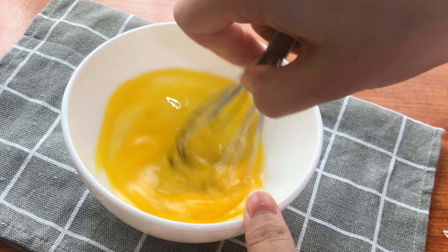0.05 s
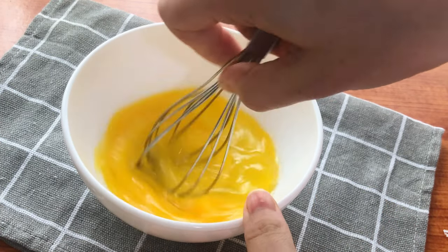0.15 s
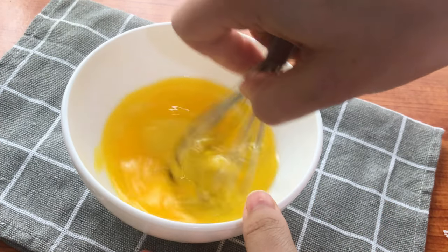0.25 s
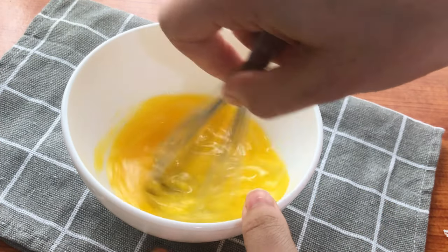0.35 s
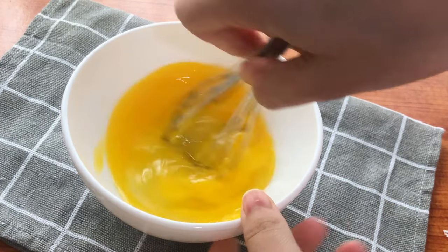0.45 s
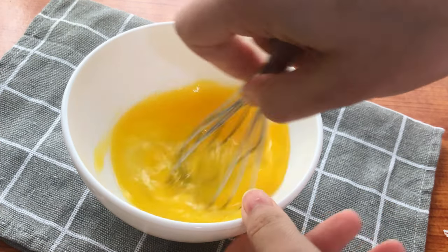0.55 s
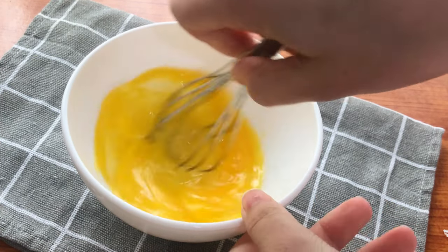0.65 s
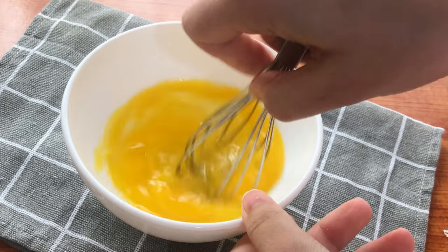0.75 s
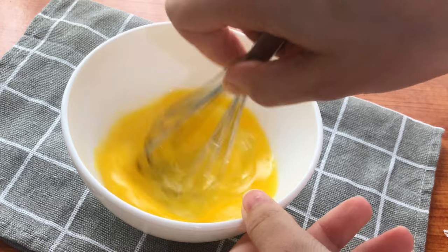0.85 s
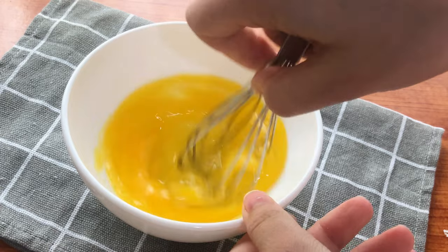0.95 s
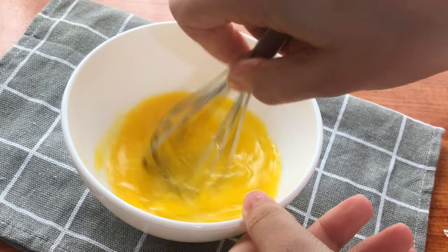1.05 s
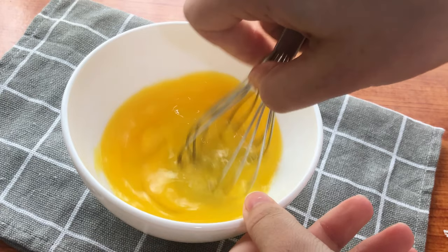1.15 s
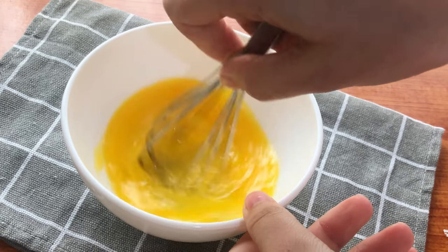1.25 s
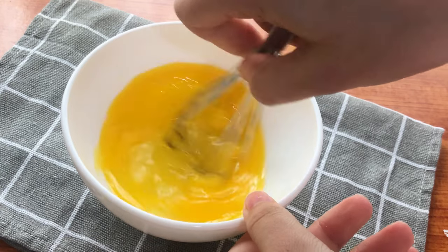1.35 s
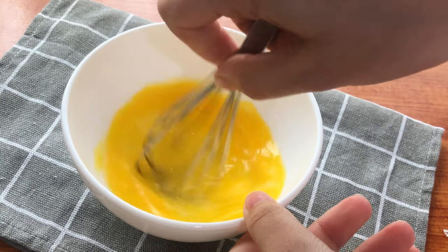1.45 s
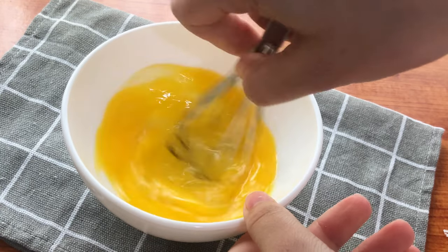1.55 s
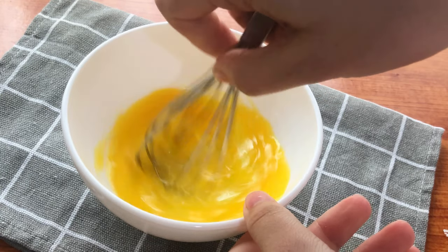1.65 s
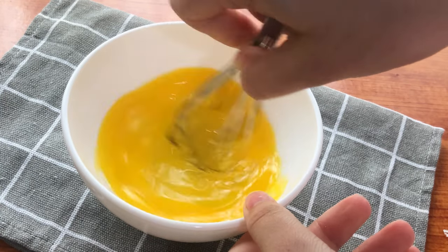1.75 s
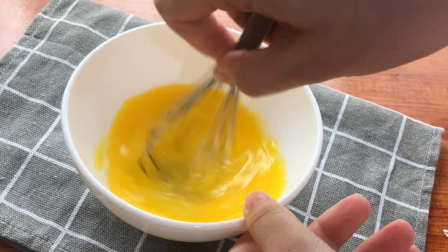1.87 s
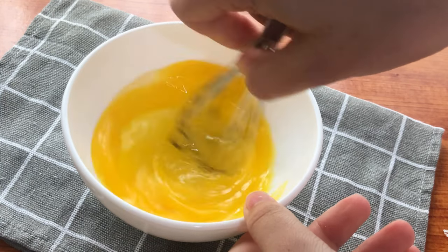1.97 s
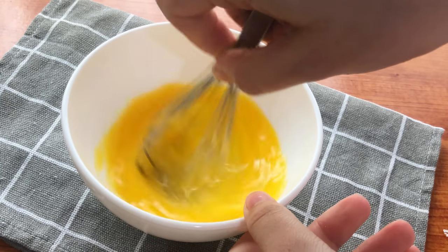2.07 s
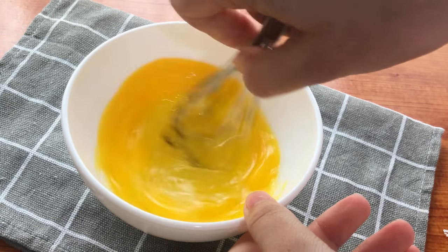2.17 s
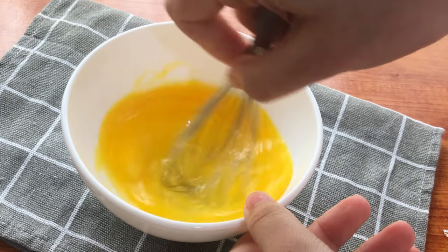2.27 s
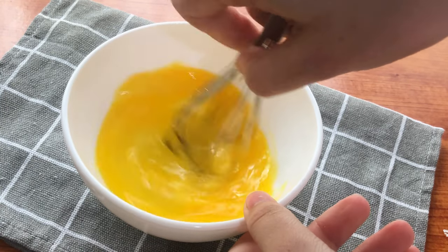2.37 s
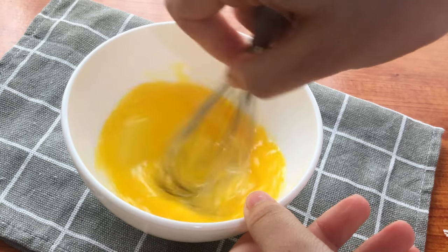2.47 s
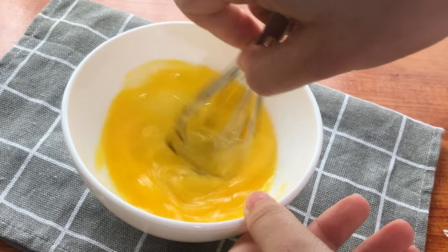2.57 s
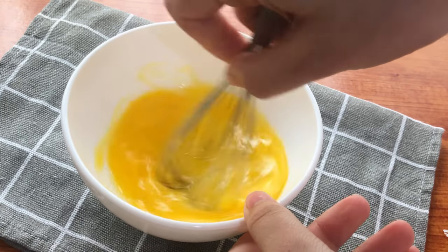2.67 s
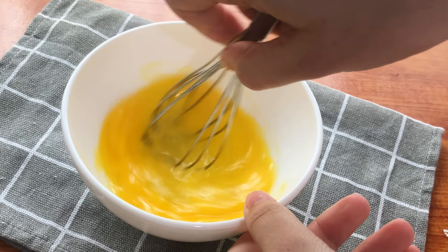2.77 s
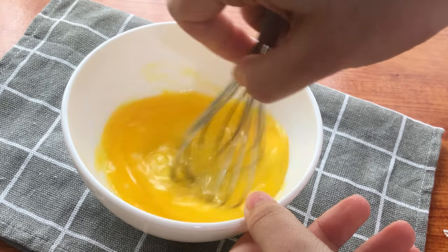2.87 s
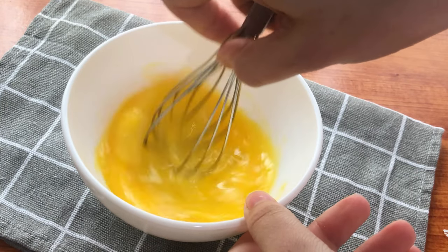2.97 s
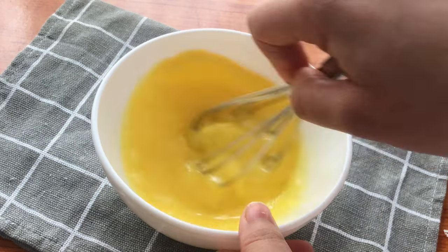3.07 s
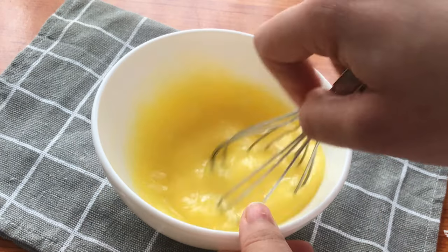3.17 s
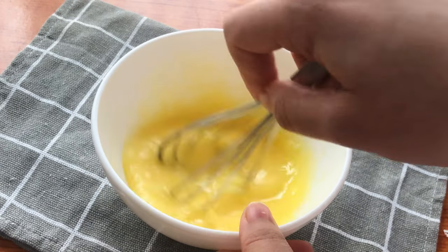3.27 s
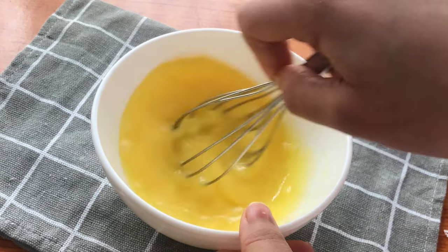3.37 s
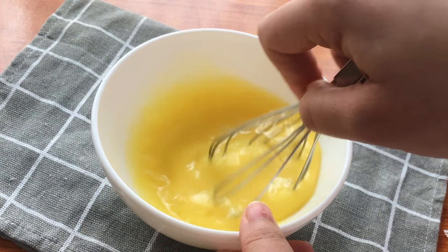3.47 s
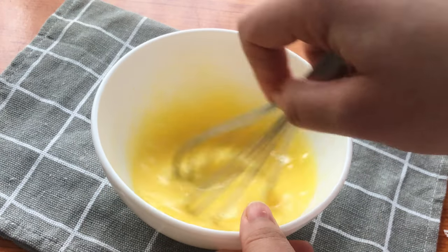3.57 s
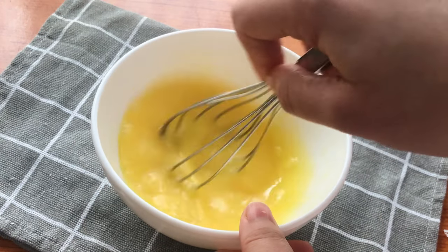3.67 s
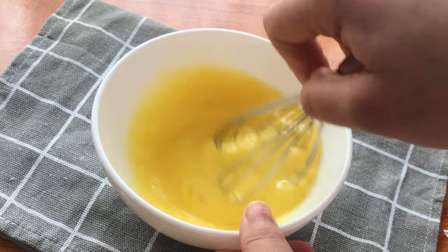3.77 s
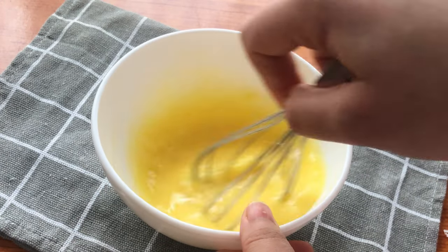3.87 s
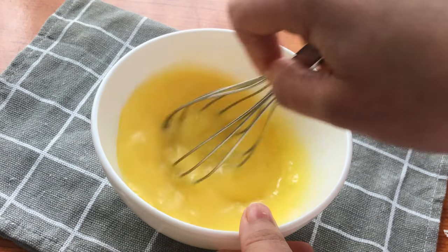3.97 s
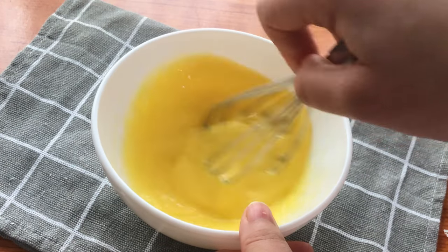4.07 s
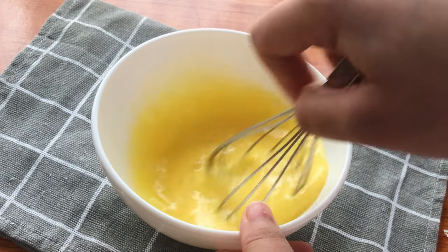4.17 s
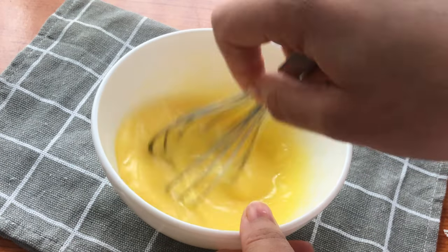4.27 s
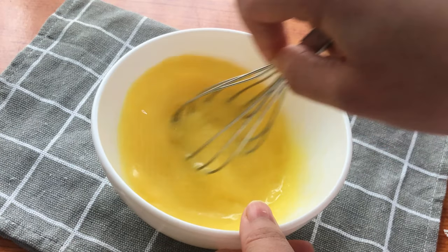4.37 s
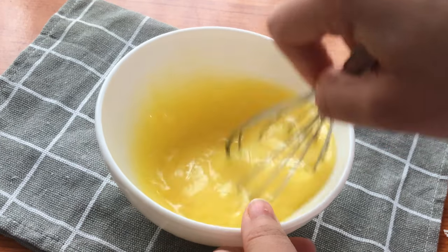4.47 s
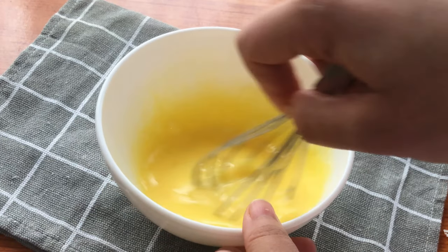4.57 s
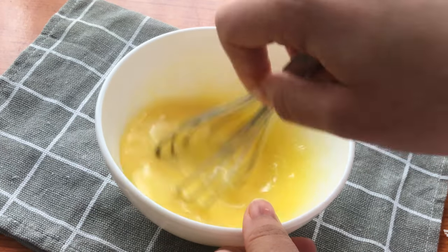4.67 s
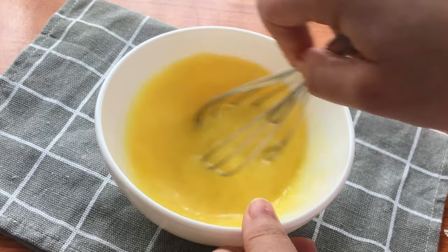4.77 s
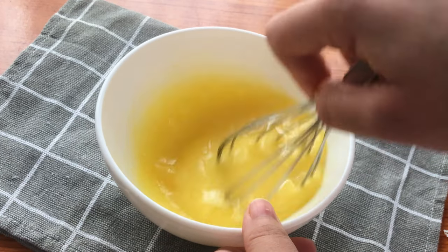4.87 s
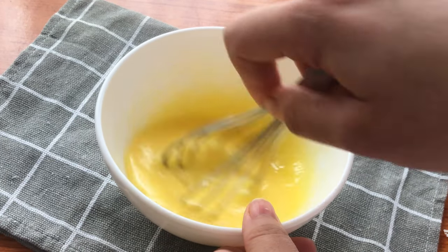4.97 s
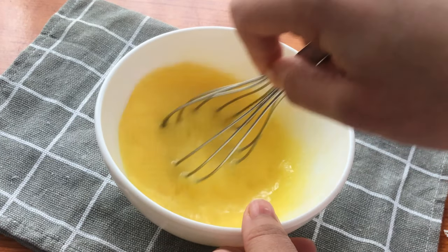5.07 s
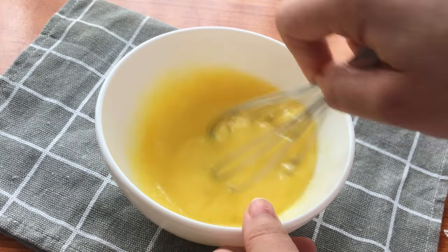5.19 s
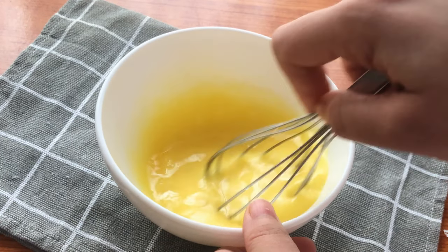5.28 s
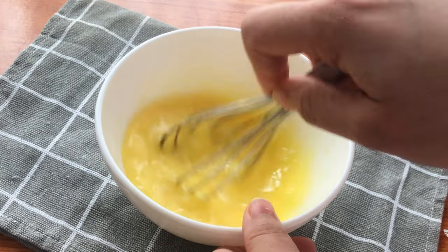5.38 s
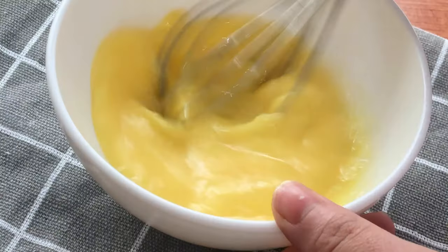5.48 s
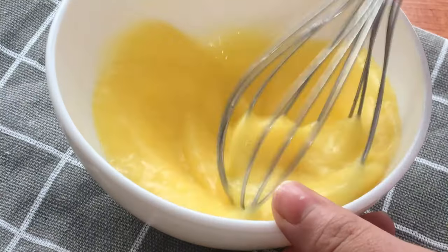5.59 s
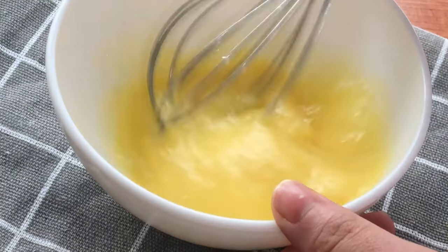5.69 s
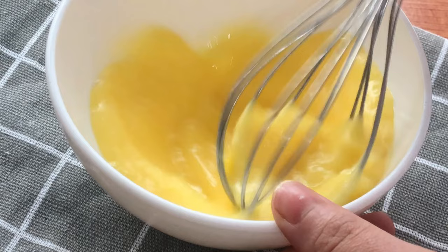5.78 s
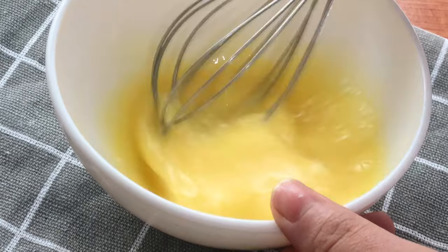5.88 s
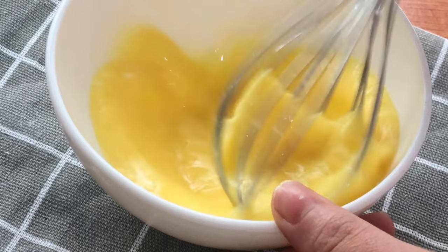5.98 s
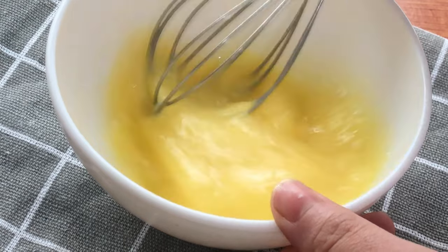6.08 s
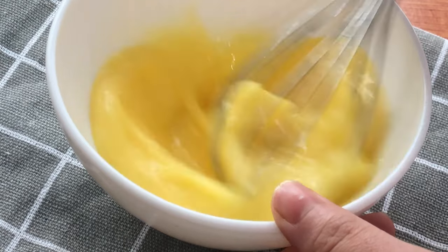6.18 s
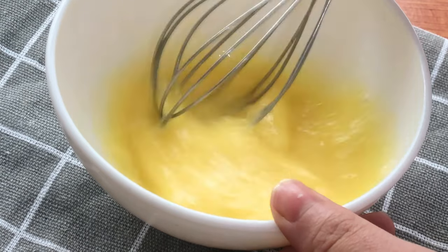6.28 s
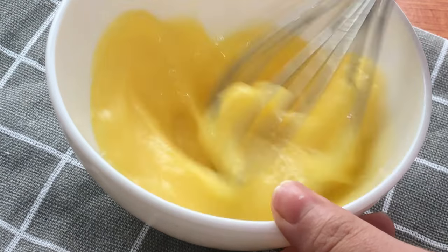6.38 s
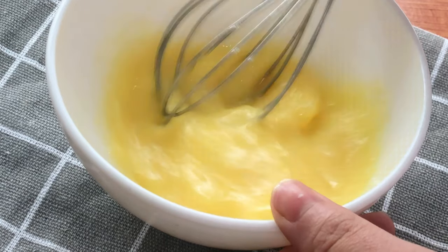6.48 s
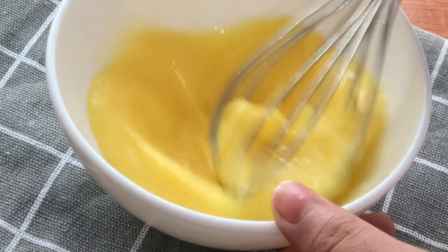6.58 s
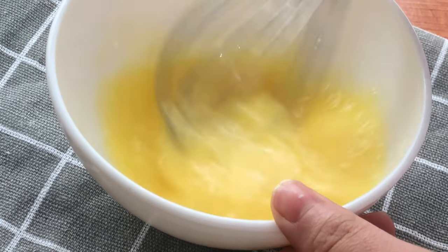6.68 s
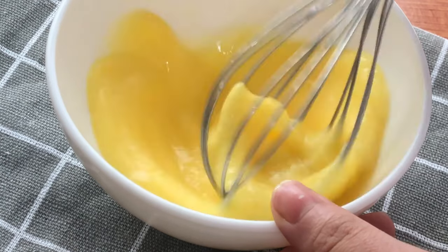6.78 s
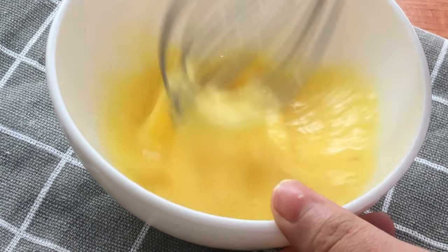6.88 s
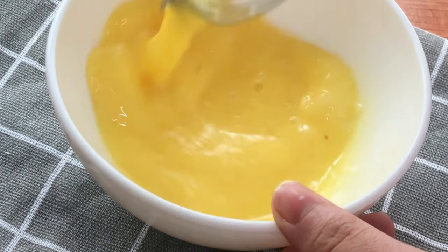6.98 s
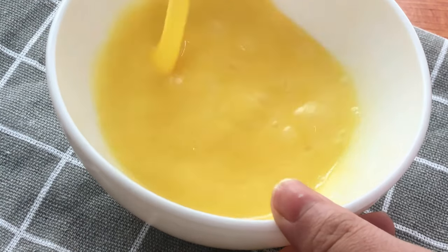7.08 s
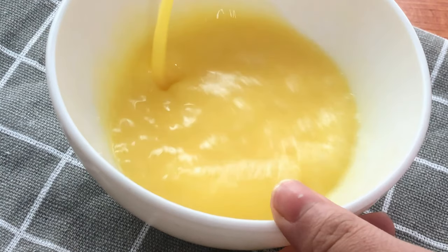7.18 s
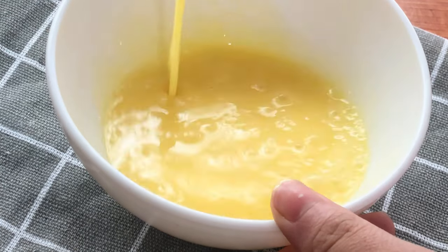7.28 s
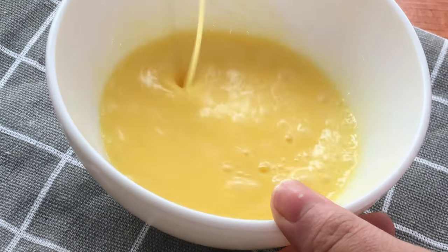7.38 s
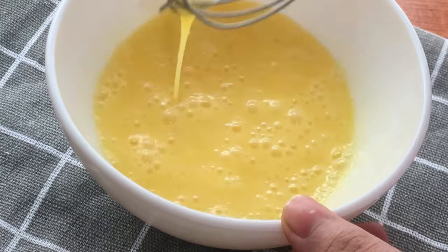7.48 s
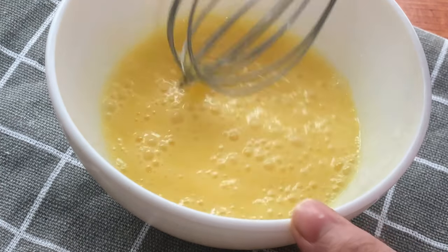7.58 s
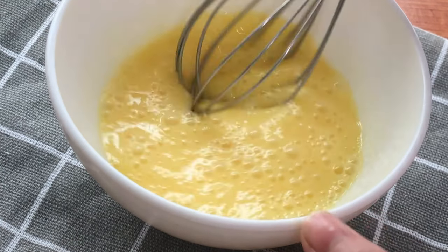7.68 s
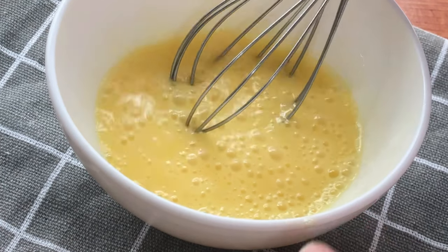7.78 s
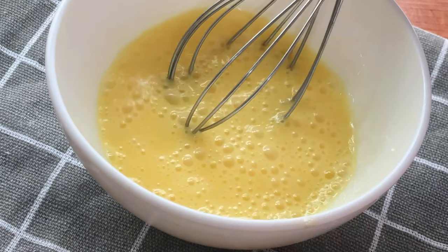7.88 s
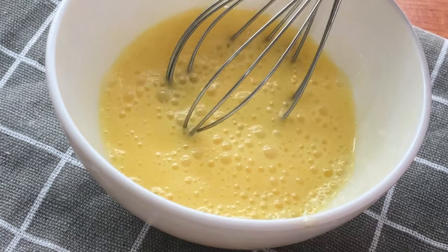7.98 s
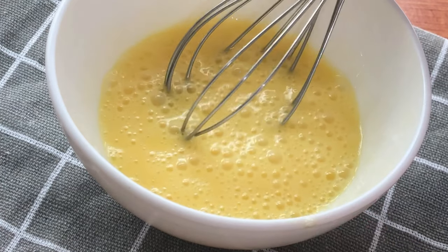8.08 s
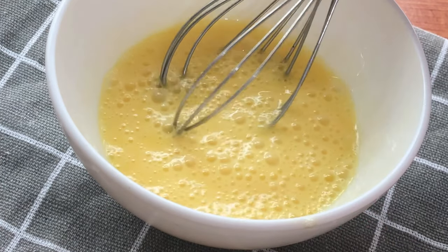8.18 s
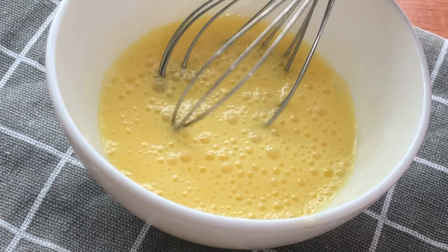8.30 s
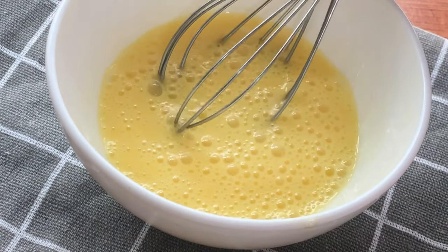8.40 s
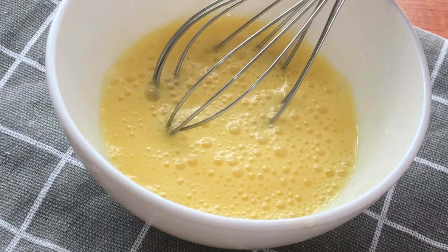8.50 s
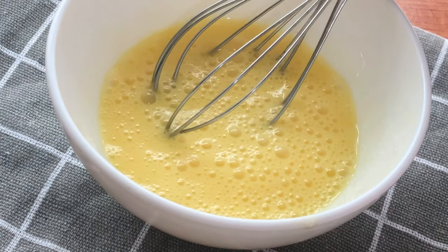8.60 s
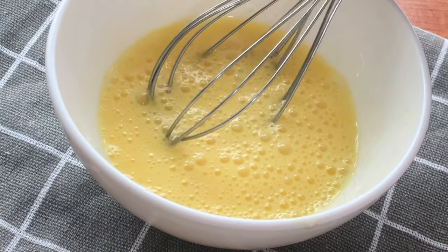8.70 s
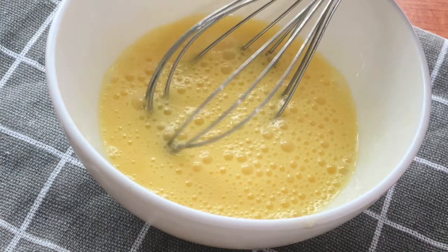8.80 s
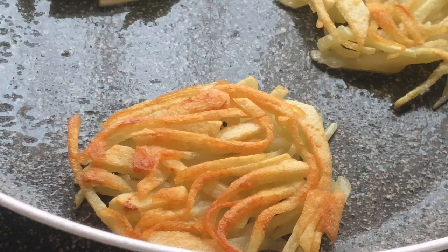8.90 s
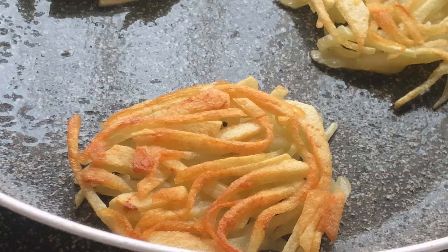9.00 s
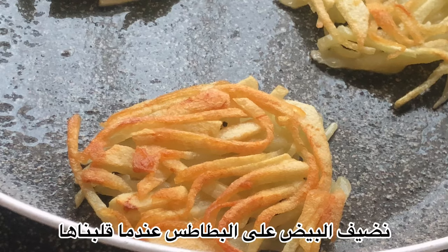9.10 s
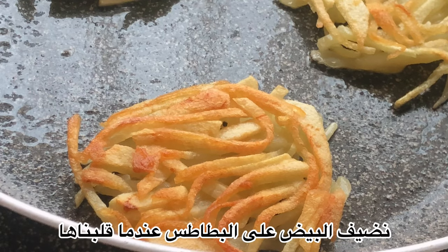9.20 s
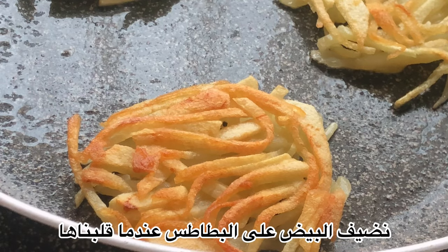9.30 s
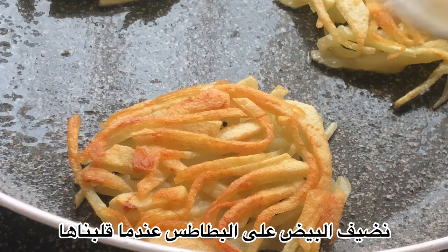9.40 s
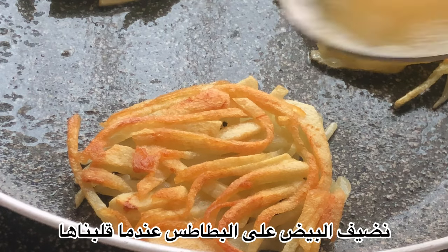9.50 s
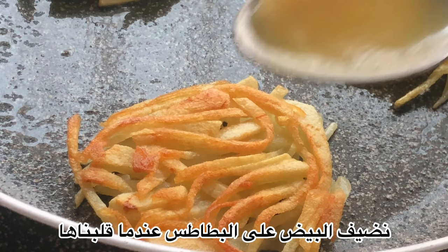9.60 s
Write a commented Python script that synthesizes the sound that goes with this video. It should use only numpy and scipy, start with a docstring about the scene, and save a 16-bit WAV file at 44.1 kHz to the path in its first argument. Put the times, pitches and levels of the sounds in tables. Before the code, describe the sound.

From 0 to 3 s a wire whisk drags quickly through egg in a ceramic bowl, close to the microphone: thin, bright, scratchy strokes, several per second, with small ticks and a sharp ringing knock near 1.95 s and another near 2.35 s. A low, noisy drone with slow swells lies underneath. At about 3.1 s the drone stops, leaving soft room hiss and one faint swell near 3.9 s; stirring continues smoother and wetter, with light taps, until 5.4 s. From 5.45 to 6.75 s hard whipping brings loud clacks, wet plops, swishes and sloshing, the sharpest snap near 6.3 s. Then it calms, with tiny bubble ticks, faint taps at 7.4 s and two soft knocks around 7.7 s. From 8 to 8.9 s, delicate wire clinks and rubbing on the rim. At 8.9 s steady oil sizzle begins, with a sharp pop near 9.3 s, and continues to the end.

```python
"""A wire whisk beats eggs in a ceramic bowl close to the microphone: stirring, then whipping hard, then at rest.
Streaked noise makes the dragging wires, pulses and noise bursts the blows, decaying modes the ringing bowl.
Behind it lie room hiss, a hum and a low drone of resonant noise that goes on until the egg is frothy, with
swells that come and go. At the end potato sizzles in a pan of oil: hissing noise and dense damped blips."""
import sys
import numpy as np
from scipy import signal
from scipy.io import wavfile
from scipy.ndimage import uniform_filter1d

SR = 44100
rng = np.random.default_rng(int(sys.argv[2]) if len(sys.argv) > 2 else 0)


def materialize(psi):
    """Save the field psi as 16-bit PCM at rate SR to the path in sys.argv[1].

    A 1-D psi becomes a single channel; in a 2-D psi each row is a channel.
    """
    bounded = np.clip(np.atleast_2d(psi).T, -1, 1)
    quanta = np.round(bounded * 32767).astype(np.int16)
    wavfile.write(sys.argv[1], SR, quanta)


N = 425565  # length [samples]
FROTHY_S = 3.085  # from here the egg is thin and frothy
PAN_S = 8.923  # the pan comes in and the room hiss stops

# wire loops strike the bowl through the egg:
# (time [s], crack level [dB], nominal plop pitch [Hz], plop level [dB])
TAPS = [(0.2917, -34, 2330, -52), (0.6472, -33.5, 1410, -43), (0.673, -34.5, 1210, -54),
        (1.737, -34, 1750, -44.5), (1.947, -18, 3050, -37), (2.03, -30, 3160, -41),
        (2.3525, -22, 1910, -48), (2.3574, -24, 1250, -58), (2.346, -31, 1150, -47.5),
        (2.996, -26, 1810, -45), (3.2157, -33.5, 1140, -55), (3.3608, -48, 3070, -41),
        (3.376, -34.5, 1580, -42.5), (3.555, -32, 1380, -51), (3.682, -38.5, 2670, -46),
        (3.698, -32.5, 2610, -36.5), (3.797, -38, 2240, -49), (4.0038, -43, 2800, -40),
        (4.0255, -38, 2450, -46), (4.036, -35.5, 1240, -49.5), (4.134, -34, 2240, -55),
        (4.191, -34.5, 2220, -45), (4.3267, -41, 2460, -49), (4.4027, -35, 1820, -44),
        (4.486, -35, 1270, -55), (4.715, -40.5, 2430, -43), (4.765, -32, 3020, -41.5),
        (4.862, -36, 2500, -58), (4.927, -35, 2080, -47), (4.99, -39.5, 2420, -60),
        (5.1266, -35.5, 1610, -43.5), (5.321, -35.5, 2060, -52), (5.452, -29.5, 1990, -38),
        (5.4987, -17, 1755, -27.5), (5.578, -57, 1270, -36), (5.664, -33.5, 1280, -33.5),
        (5.706, -19.5, 1444, -27.5), (5.804, -62, 850, -37), (5.8796, -50, 1320, -26.5),
        (5.883, -51, 690, -35), (5.904, -18.5, 1870, -25.5), (6.088, -37, 2464, -36.5),
        (6.117, -17.5, 2030, -25.5), (6.202, -28, 1065, -35.5), (6.3007, -16, 1253, -32.5),
        (6.324, -19, 1810, -28), (6.4215, -38.5, 845, -41), (6.484, -35, 1510, -54),
        (6.4956, -33, 1330, -45), (6.536, -22, 1627, -29.5), (6.6274, -26, 1580, -37),
        (6.6889, -64, 1210, -33), (6.7311, -18.5, 2040, -26), (7.349, -45, 1390, -44.5),
        (7.3928, -41.5, 1350, -45.5), (7.678, -25.5, 1105, -36.5), (7.7233, -26.5, 1160, -39.5)]
# spells of stirring: (start [s], end [s], hiss between strokes [dB])
STIR_SPELLS = [(0, 1.394, -67), (1.398, 3.09, -77.5), (3.08, 5.425, -66)]
# wires drag along the glaze, stroke by stroke: (start [s], end [s], level [dB])
STROKES = [(0, 0.168, -62.5), (0.204, 0.32, -63.5), (0.372, 0.484, -60.5), (0.528, 0.586, -58),
           (0.64, 0.713, -60.5), (0.755, 1.12, -61), (1.055, 1.245, -62.5), (1.299, 1.394, -60.5),
           (1.415, 1.456, -56), (1.482, 1.581, -57.5), (1.619, 1.641, -58.5), (1.701, 1.811, -58),
           (1.847, 1.878, -55.5), (1.95, 2.096, -58.5), (2.138, 2.224, -58.5), (2.348, 2.415, -55),
           (2.524, 2.636, -62), (2.66, 2.712, -58.5), (2.761, 3.067, -60.5), (3.111, 3.213, -56),
           (3.197, 3.32, -58), (3.37, 3.653, -58), (3.704, 3.98, -58), (4.028, 4.22, -59),
           (4.374, 4.626, -60.5), (4.754, 4.952, -59.5), (5.127, 5.42, -58.5)]


def amp(db):
    """Decibels to linear gain."""
    return 10 ** (np.asarray(db) / 20)


def evened(x):
    """Scale to an RMS of 1."""
    return x / np.sqrt(np.mean(x ** 2) + 1e-20)


def add(mix, s, sound):
    """Add a sound into the mix from time s, cut off at the end of the mix."""
    part = mix[round(s * SR):][:len(sound)]
    part += sound[:len(part)]


def noise(spectrum, size, streak_db=0., flicker_db=0., streak_frames=6, streak_bins=3,
          start_s=0, end_s=N / SR):
    """Random short-time spectra; streaks are brief narrow rings that stand out, flicker shakes all bins at once."""
    first, last = round(start_s * SR), round(end_s * SR)
    frames = 4 * (last - first) // size + 5
    hz = np.fft.rfftfreq(size, 1 / SR)
    real, imag, streaks = rng.standard_normal((frames, len(hz), 3)).T
    streaks = uniform_filter1d(streaks, streak_bins, 0)
    streaks = evened(uniform_filter1d(streaks, streak_frames, 1))
    # strong streaks are stretched upward, up to a ceiling
    streaks = np.minimum(streaks + np.maximum(streaks - 1, 0), 3.5)
    flicker = evened(uniform_filter1d(rng.standard_normal(frames), size=5))
    f, db = np.transpose(spectrum)
    colour_db = np.interp(np.log(hz + 1), np.log(f), db)[:, None]
    z = (real + 1j * imag) * amp(colour_db + streak_db * streaks + flicker_db * flicker)
    sound = signal.istft(z, nperseg=size, noverlap=3 * size // 4)[1][:last - first]
    return np.pad(evened(sound), (first, N - last))


def resonate(x, hz, width):
    """A fixed resonance of gain 1 at its centre; width in Hz."""
    return signal.lfilter(*signal.iirpeak(hz, hz / width, SR), x)


def grains(per_s, lo_hz, hi_hz, cycles, spread_db):
    """Randomly timed damped blips of ten pitches and uneven sizes."""
    size = amp(spread_db * np.minimum(rng.exponential(1, N), 4))
    size = size * (rng.random(N) < per_s / SR)
    kind, out = rng.integers(0, 10, N), np.zeros(N)
    for k, hz in enumerate(np.geomspace(lo_hz, hi_hz, num=10)):
        turns = np.arange(512) / SR * hz
        blip = np.sin(2 * np.pi * turns) * np.exp(-turns / cycles) * np.minimum(turns, 1)
        out += signal.oaconvolve(size * (kind == k), blip)[:N]
    return evened(out)


def drag():
    """Gain of the dragging wires: firm in each stroke, a low hiss between, with soft edges."""
    t, gain = np.arange(N) / SR, np.zeros(N)
    for start, end, db in STIR_SPELLS + STROKES:
        gain[(t >= start) & (t < end)] = amp(db)
    return uniform_filter1d(gain, size=300)


def stirring():
    """Dragging wires hiss in streaks; after each plop the egg sloshes and bubbles; hard whipping swishes."""
    # colours of the drag in thick egg, in frothy egg, and of the slosh:
    # each (frequency [Hz], relative density [dB per Hz])
    thick_colour, frothy_colour, slosh_colour = [
        [(1500, -14), (3000, -8.5), (4500, -3), (8500, -3.5), (12500, -2), (16000, -3.5)],
        [(700, -36), (1200, -5.5), (3830, -1.5), (8350, -9), (15500, -5)],
        [(500, -24), (1000, -5.5), (4800, -2), (7000, -15.5), (16000, -20)],
    ]
    # the loops sweep up the wall in hard whipping: (loudest moment [s], level [dB])
    swishes = [(5.54, -41), (5.744, -41), (5.944, -41.5), (6.096, -42.5), (6.142, -44), (6.345, -45.5),
               (6.555, -41), (6.751, -42.5)]
    swish_half_s = 0.011
    t = np.arange(N) / SR
    stir_end_s = STIR_SPELLS[-1][1]

    thick = noise(thick_colour, size=256, streak_db=3.6, flicker_db=3.5,
                  streak_frames=26, streak_bins=3, end_s=FROTHY_S)
    frothy = noise(frothy_colour, size=256, streak_db=3.6, flicker_db=3.0,
                   streak_frames=40, streak_bins=2, start_s=FROTHY_S, end_s=stir_end_s)
    dragging = drag() * (thick + frothy)

    stirred = np.zeros(N)  # how much the egg moves after the plops
    settle_t = t[:20000]
    for s, _, _, plop_db in TAPS:
        settling = amp(plop_db - 23.5 - 60 * settle_t / 0.5) * np.minimum(settle_t / 0.0046, 1)
        add(stirred, s, settling)
    slosh = noise(slosh_colour, size=256, streak_db=4.0, flicker_db=4.5)
    bubbles = grains(500, 800, 6500, 2.1, 5.2)
    settling_egg = stirred * (0.47 * slosh + 0.58 * bubbles)

    sweep = sum(amp(db) * np.exp(-((t - s) / swish_half_s) ** 2) for s, db in swishes)
    spray = noise([(600, -17.5), (1500, 2.0), (5000, 0.5), (9000, -6.0), (15000, -0.5)], size=256,
                  streak_db=3, flicker_db=1.5, streak_frames=30, streak_bins=2,
                  start_s=stir_end_s, end_s=PAN_S)
    return dragging + settling_egg + sweep * spray


def low_drone():
    """Noise in a few low resonances with a broad shoulder, steady until the egg is frothy, and its swells."""
    # resonances of the drone: (frequency [Hz], width of the first filter [Hz], relative level [dB])
    modes = [(123.6, 4.1, -5.5), (158.7, 36, -2), (223.4, 17.4, 1), (255, 17.2, -0.5), (284.3, 87, -2)]
    # swells, each around one pitch: (loudest moment [s], level [dB], half length [s], pitch [Hz])
    swells = [(0.842, -50.5, 0.18, 219), (2.848, -50, 0.19, 255), (3.872, -55.5, 0.1, 302.6),
              (7.78, -62, 0.22, 191)]
    drone_db, shoulder_db, swell_shoulder_db = -51.5, -70, -13.5  # the last is relative to its swell
    t = np.arange(N) / SR
    low_noise, wide_noise = rng.standard_normal((2, N))

    drone = np.zeros(N)
    for hz, width, db in modes:
        drone += amp(db) * evened(resonate(resonate(low_noise, hz, width), hz, 2.86 * width))
    drone = evened(drone)
    band = signal.butter(3, [330, 830], "band", fs=SR, output="sos")
    shoulder = evened(signal.sosfilt(band, wide_noise))

    out = (t < FROTHY_S) * (amp(drone_db) * drone + amp(shoulder_db) * shoulder)
    for s, db, half, hz in swells:
        same_side = (t < FROTHY_S) == (s < FROTHY_S)  # a swell never crosses into the other part
        rise = amp(db) * np.exp(-((t - s) / half) ** 2) * same_side
        pitched = evened(resonate(resonate(wide_noise, hz, 27), hz, 40))
        out += rise * (0.68 * drone + 0.77 * pitched + amp(swell_shoulder_db) * shoulder)
    return out


def room_tone():
    """Room hiss that steps in level until the pan comes in, and a wavering hum of noise near 55 Hz."""
    # colour of the hiss: (frequency [Hz], relative density [dB per Hz])
    colour = [(44, -39), (75, -7), (141, -2), (304, -7), (417, -12.5), (900, -19), (1700, -21.5),
              (2700, -30), (16500, -45.5)]
    # level steps of the hiss: (from [s], level [dB])
    step_s, step_db = np.transpose([(0, -61), (3.085, -63), (5.425, -59.5)])
    t = np.arange(N) / SR
    hum = evened(resonate(resonate(rng.standard_normal(N), 55.3, 6.4), 56.0, 34.4))
    gain = amp(step_db)[np.searchsorted(step_s, t, "right") - 1] * (t < PAN_S)
    return gain * noise(colour, size=2048) + amp(-65.5) * hum


def blows():
    """The listed blows, and a soft landing for every stroke after the first that starts without one."""
    # the soft landing: (crack level [dB], nominal plop pitch [Hz], plop level [dB])
    landing = (-46, 2550, -59)
    times = np.array(TAPS)[:, 0]
    starts = [start for start, _, _ in STROKES[1:] if abs(times - start).min() > 0.02]
    return TAPS + [(start, *landing) for start in starts]


def taps():
    """Each blow is a tick, a broad crack, a short splashy plop of trapped air and a thump of the bowl on its cloth."""
    out, t = np.zeros(N), np.arange(5000) / SR
    bright = signal.butter(2, 2200, "high", fs=SR, output="sos")
    for s, db, hz, plop_db in blows():
        crack_noise, plop_noise, thump_noise = rng.standard_normal((3, len(t)))
        tick = 0.91 * np.sin(2 * np.pi * 9000 * t) * amp(-60 * t / 0.0006)

        fall = 0.85 * amp(-60 * t / 0.013) + amp(-35 - 60 * t / 0.028)
        # the knock is strongest around 4-5.5 kHz
        knock = signal.sosfilt(bright, crack_noise) + 1.19 * resonate(crack_noise, 4770, 1370)
        crack = tick + 0.6 * knock * fall * np.minimum(t / 0.0013, 1)

        # the pocket shrinks, its pitch rises; larger pockets ring longer
        pocket = np.sin(2 * np.pi * hz * t * (0.95 + 5.75 * t))
        splash = evened(resonate(plop_noise, hz * 1.06, hz * 0.65))
        shape = np.minimum(t / 0.0018, 1) * amp(-60 * t * hz / 50)
        plop = shape * (0.62 * pocket + 0.49 * splash)

        thump_hz = 150 + 15 * thump_noise[0]
        thump = 0.4 * evened(resonate(thump_noise, 140, 55)) + 0.56 * np.sin(2 * np.pi * thump_hz * t)
        thump = thump * np.minimum(t / 0.025, 1) * amp(-12.5 - 60 * t / 0.28)
        add(out, s - 0.0003, amp(db) * crack + amp(plop_db) * (plop + thump))
    return out


def bowl_contact():
    """Bare wire sets the bowl's modes ringing, then touches again; resting wires creep and rub on the rim."""
    # modes of the bowl: (frequency [Hz], relative level [dB], t60 [s])
    modes = [(2356, 1.5, 0.71), (4178, -3.5, 0.19), (6340, -1.5, 0.12), (6590, -7.5, 0.1),
             (9000, -14.5, 0.082), (11800, -16, 0.07), (14990, -17, 0.066)]
    # wire touches the rim; where it lands decides between low and high modes:
    # (time [s], lowest mode [dB], middle modes [dB], high modes [dB])
    clinks = [(0.9822, -88, -83, -52.5), (1.1917, -106, -87, -53.5), (1.947, -58, -49, -79),
              (2.3577, -67, -45.5, -64), (6.2016, -76, -73, -37.5), (8.0335, -70, -55.5, -55.5),
              (8.3, -76, -53.5, -85), (8.3548, -75, -53.5, -58), (8.468, -75, -64, -55),
              (8.493, -80, -70, -57), (8.543, -78, -59.5, -68), (8.7208, -74, -53.5, -59),
              (8.885, -68, -53, -55.5)]
    # the resting wires creep on the rim: (time [s], level [dB])
    creep_s, creep_db = np.transpose([(8.29, -79), (8.43, -62.5), (8.48, -61.5), (8.56, -68.5),
                                      (8.68, -63.5), (8.84, -67.5), (8.92, -59)])
    rattle = 0.7  # depth of the wire's tremble on the glaze, which roughens the ring
    out, t = np.zeros(N), np.arange(14000) / SR
    hz, mode_db, t60 = np.array(modes).T[:, :, None]

    for s, lowest_db, middle_db, high_db in clinks:
        phase = rng.random((len(modes), 1))
        db = mode_db + np.select([hz < 3000, hz < 5500], [lowest_db, middle_db], high_db)
        # a fast first fall while the wire still rests on the glaze
        fall = amp(-60 * t / t60) * (0.5 + 1.15 * np.exp(-t / 0.024)) * np.minimum(t / 0.002, 1)
        tremble = evened(uniform_filter1d(rng.standard_normal(len(t)), size=150))
        fall = fall * (1 + rattle * tremble)
        tick_fall = amp(max(middle_db, high_db) - 8.5 - 60 * t / 0.051)
        tick = evened(resonate(rng.standard_normal(len(t)), 4200, 2310)) * tick_fall
        ring = (amp(db) * fall * np.sin(2 * np.pi * (hz * t + phase))).sum(0) + tick
        add(out, s, ring)
        add(out, s + rng.uniform(0.012, 0.041), amp(-18.5) * ring)  # the softer second touch

    chatter = grains(1500, 1900, 13000, 0.19, 0.99)  # tiny slips keep all but the lowest mode ringing
    rubbed = np.zeros(N)
    for f, db, ring_s in modes[1:]:
        rubbed += amp(db) * evened(resonate(chatter, f, 12 / ring_s))
    creep = amp(np.interp(np.arange(N) / SR, creep_s, creep_db, left=-np.inf, right=-np.inf))
    return out + creep * (0.24 * evened(rubbed) + 0.54 * chatter)


def tinkles():
    """Wire on wire or bowl: noise through a resonance gives short rough rings around one pitch."""
    # (time [s], pitch [Hz], level [dB], t60 [s])
    rings = [(1.30, 5020, -55, 0.055), (1.416, 4480, -47, 0.034), (1.534, 5050, -51, 0.076),
             (2.061, 6200, -53.5, 0.13), (7.68, 1068, -55, 0.45), (1.947, 3010, -25, .02)]
    out, t = np.zeros(N), np.arange(9000) / SR
    for s, hz, db, t60 in rings:
        z = rng.standard_normal(len(t) + 2000)  # the extra samples let the filter settle
        ring = resonate(resonate(z, hz, 0.064 * hz), hz, 0.12 * hz)[-len(t):]
        add(out, s, amp(db - 60 * t / t60) * np.minimum(t / 0.0014, 1) * evened(ring))
    return out


def ticks():
    """Snapping wires and bursting bubbles: brief pulses that die within a few cycles, with no ring."""
    # single wires snap against the glaze or bubbles burst in egg and oil:
    # (time [s], level [dB], centre frequency [Hz])
    snaps = [(1.9465, -19.5, 8800), (5.439, -42, 11000), (5.4726, -19, 12500), (5.632, -42, 4500),
             (5.683, -42, 6000), (5.892, -32, 12000), (5.982, -35, 3480), (6.023, -34.5, 6030),
             (6.3021, -10, 9300), (6.306, -20, 14000), (6.828, -43, 6000), (6.881, -50, 2500),
             (6.917, -54, 6000), (7.2757, -48, 5000), (7.643, -50, 3500), (7.657, -42, 6500),
             (8.478, -48, 4800), (9.2724, -15, 4470), (4.666, -41, 7000), (5.087, -45, 4000)]
    out, t = np.zeros(N), np.arange(-60, 300) / SR
    for s, db, hz in snaps:
        cycles = 0.5 - 0.01 * db  # softer ticks are narrower in pitch
        shape = np.exp(np.where(t < 0, 2, -1) * t * hz / cycles)  # rises twice as fast as it falls
        add(out, s + t[0], amp(db) * np.sin(2 * np.pi * hz * t + 1) * shape)
    return out


def pan():
    """Dense fizz of steam bubbles and the pan singing faintly."""
    # colour of the sizzle: (frequency [Hz], relative density [dB per Hz])
    colour = [(47, -35), (87, -9), (417, -15.5), (609, -3.5), (994, -8.5), (1810, -2.5), (2030, -6.5),
              (4630, -1), (15100, -6.5), (16500, -12.5)]
    fizz = noise(colour, size=512) + 0.25 * grains(2500, 3800, 15000, 0.8, 4.1)
    singing = evened(resonate(resonate(rng.standard_normal(N), 1800, 70), 1800, 140))
    fade_in = np.clip((np.arange(N) / SR - PAN_S) / 0.02, 0, 1)
    return amp(-43.5) * evened(fizz + 0.13 * singing) * fade_in


def scene():
    """The contacts with their reverberation, the stirred egg, the kitchen and the pan."""
    near = taps() + ticks() + bowl_contact() + tinkles()
    t = np.arange(8000) / SR
    # tiled walls return a short diffuse tail
    tail = rng.standard_normal(len(t)) * amp(-60 * t / 0.31) * (t > 0.004)
    wet = signal.oaconvolve(near, tail / np.linalg.norm(tail))[:N]
    return (near + amp(-15.0) * wet + stirring() + low_drone() + room_tone() + pan())[None]


def record(dry):
    """The small microphone port lifts the top treble; then the band limit at 15.9 kHz."""
    lifted = dry + 0.57 * resonate(dry, 15400, 3100)
    band_limit = signal.firwin(511, 15900, window=("kaiser", 9), fs=SR)
    return signal.oaconvolve(lifted, band_limit[None], "same")


dry = scene()
out = record(dry)
materialize(out)
```